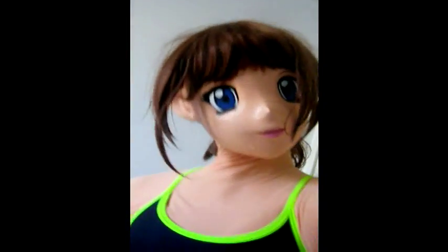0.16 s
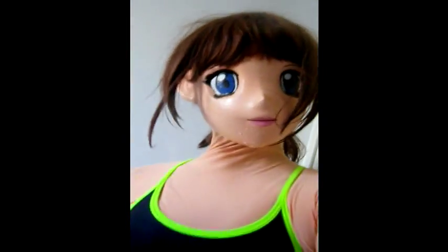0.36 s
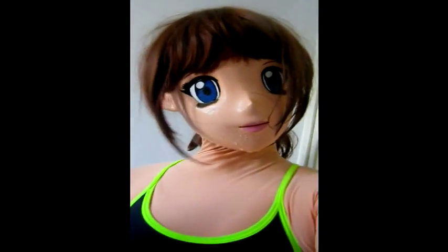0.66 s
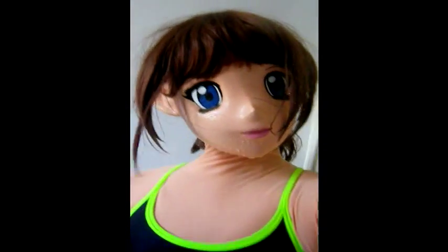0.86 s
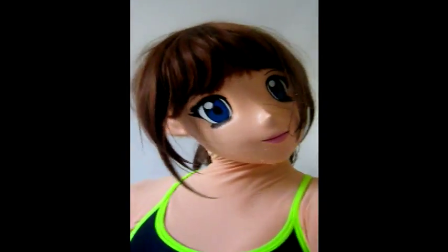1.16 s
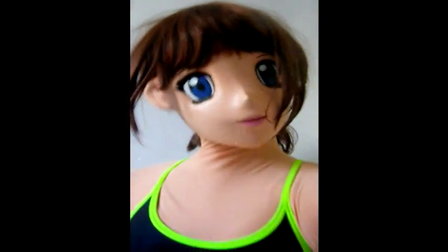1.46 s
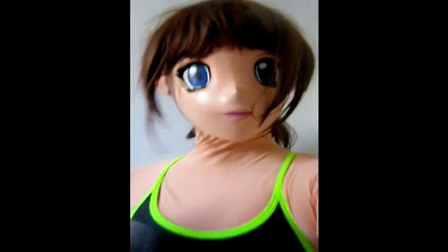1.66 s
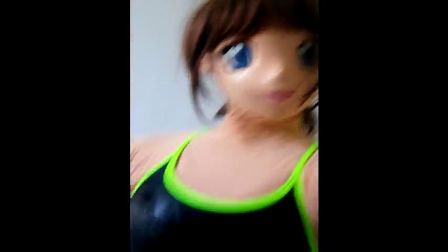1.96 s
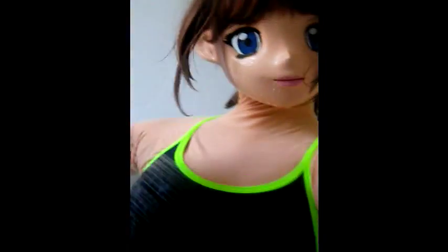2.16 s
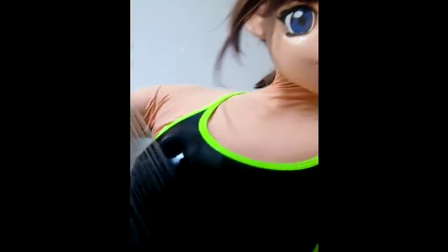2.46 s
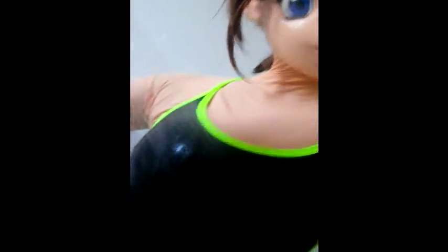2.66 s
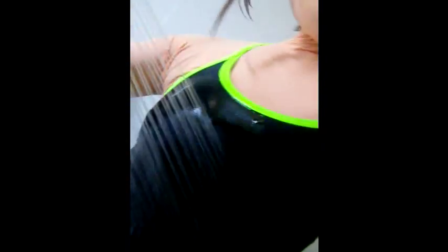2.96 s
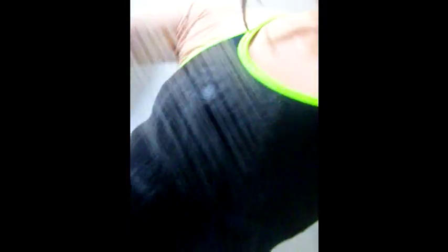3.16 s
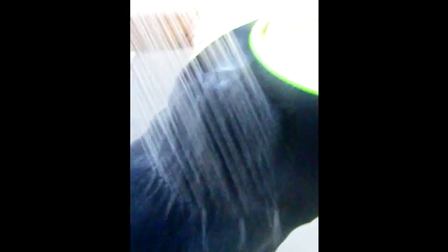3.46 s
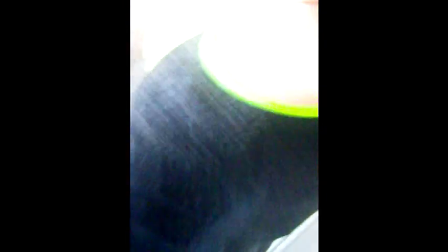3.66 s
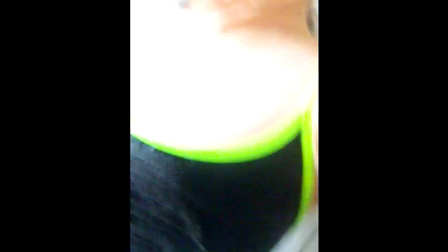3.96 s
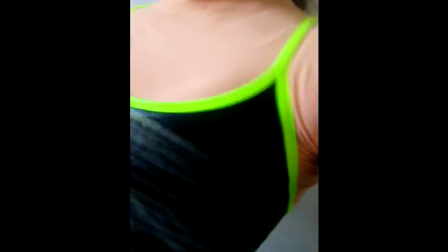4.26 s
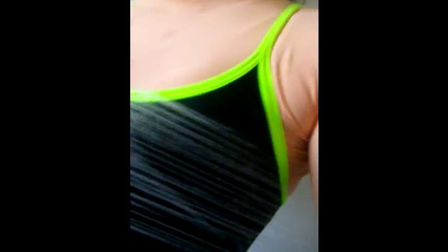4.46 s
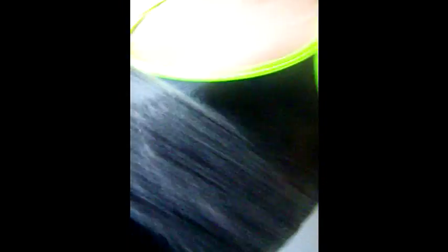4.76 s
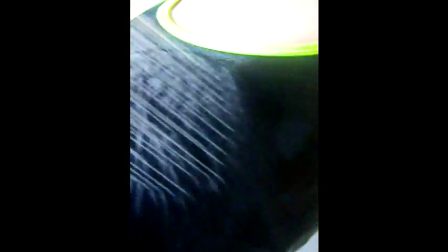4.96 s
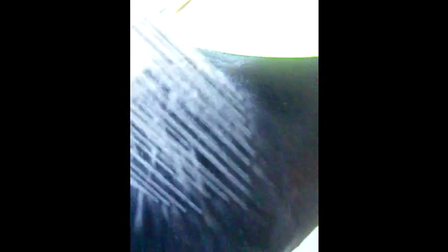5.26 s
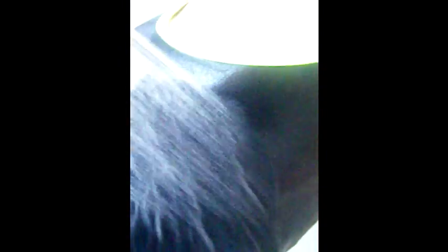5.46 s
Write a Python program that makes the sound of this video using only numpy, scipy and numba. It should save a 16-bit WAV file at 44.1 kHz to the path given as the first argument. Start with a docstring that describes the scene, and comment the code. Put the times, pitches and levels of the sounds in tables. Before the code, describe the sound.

In a small tiled bathroom, water surges up a shower hose with faint gurgles and hiss. A hard crack and airy burst spit from the head, quickly followed by a fizzing second spit. Then fine jets hiss continuously, pattering and splashing on a stretched swimsuit while run-off drums dully on the tub. A close phone microphone gives a bright sound with little bass and short echoes.

```python
"""Water gurgles and hisses up the hose of a hand shower in a small tiled bathroom, then trapped air spits twice.
Fine jets follow, hissing and pattering on a stretched swimsuit close by, while the run-off drums on the tub.
The jets sweep over the body, so the hollow note of the cloth and the splash come and go.
Water is built from noise and random drops, shaped by spectra and moving resonances; air pops ring the casing.
A phone microphone with narrow notches listens."""
import sys
import numpy as np
from scipy import signal
from scipy.fft import rfft, irfft, next_fast_len
from scipy.io import wavfile
from numba import njit

SR = 44100
rng = np.random.default_rng(int(sys.argv[2]) if len(sys.argv) > 2 else 0)


def transcribe(signal):
    """Save signal, clipped to [-1, 1], as a 16-bit WAV file at the path in sys.argv[1]."""
    frames = np.atleast_2d(signal).T
    limited = np.clip(frames, -1, 1)
    pcm = np.round(limited * 32767).astype(np.int16)
    wavfile.write(sys.argv[1], SR, pcm)


N = 247401
T = np.arange(N) / SR   # time of every sample, in seconds

# Tone of fine mist and fizz: pitch_hz, level_db (per Hz, relative)
MIST_TONE = [(7000, -15), (10000, -8), (11500, -7), (13000, -4.5), (14700, -5.5), (15600, -3.5)]
# Flow of the open shower: time_s, jet_hiss_db, mist_db, drumming_db
FLOW_LEVELS = [(0.86, -27, -38, -58), (0.91, -27, -25, -37), (0.99, -30.5, -29.5, -30.5),
               (1.08, -23.5, -24.5, -19.5), (1.14, -25, -19.5, -23), (1.27, -26, -23.5, -23.5),
               (1.4, -23, -21, -25), (1.51, -20.5, -21.5, -21), (1.57, -20.5, -25, -27),
               (1.63, -22, -27, -28.5), (1.8, -16.5, -24, -33), (1.97, -18.5, -32, -34.5),
               (2.24, -17.5, -26, -33.5), (2.5, -18.5, -27, -30.5), (2.97, -17, -26, -37),
               (3.05, -20.5, -27, -34.5), (3.32, -18, -24.5, -35.5), (3.4, -21, -26.5, -33.5),
               (3.78, -17.5, -26, -30), (3.95, -19.5, -30, -35.5), (4.1, -19, -26, -37),
               (4.4, -23.5, -24, -32.5), (4.75, -23.5, -22.5, -27.5), (4.9, -20.5, -22, -28),
               (4.98, -19.5, -25, -34.5), (5.2, -20, -22, -40), (5.61, -21, -24.5, -39)]


def amp(db):
    """Turns a level in dB into a gain."""
    return 10 ** (np.asarray(db) / 20)


def rms_one(x):
    """Scales a sound to an average strength (rms) of 1."""
    return x / np.sqrt(np.mean(x ** 2) + 1e-20)


def in_time(rows):
    """Draws straight lines between table rows; gives each column at every sample."""
    times_s, *columns = np.transpose(rows)
    return [np.interp(T, times_s, column) for column in columns]


def fade(start_s, rise_s):
    """Rises in a straight line from silence to full."""
    return np.clip((T - start_s) / rise_s, 0, 1)


def drift(rate_hz):
    """Slow random wandering of spread 1: noise smoothed twice, made at every 40th sample."""
    keep = np.exp(-80 * np.pi * rate_hz / SR)
    noise = rng.standard_normal(N // 40 + 2002)
    slow = signal.lfilter([1], [1, -2 * keep, keep * keep], noise)[2000:]   # skip the start-up
    return np.interp(np.arange(N) / 40, np.arange(len(slow)), rms_one(slow))


def colour(x, tone):
    """Filters x with a curve of (pitch_hz, level_db) points; rms 1."""
    size = next_fast_len(N)
    pitch_hz, level_db = np.transpose(tone)
    log_hz = np.log(np.maximum(np.arange(size // 2 + 1) * SR / size, 1))
    gain = amp(np.interp(log_hz, np.log(pitch_hz), level_db))
    return rms_one(irfft(rfft(x, size) * gain, size)[:N])


def drops(per_s, spread_db):
    """Random impacts of uneven size, pushing either way; rms 1."""
    sizes = amp(spread_db * np.minimum(rng.exponential(1, N), 5))
    signs = rng.choice([-1, 1], N)
    return rms_one(sizes * signs * (rng.random(N) < per_s / SR))


@njit
def resonate(x, hz, width_hz, sr):
    """A resonance whose centre and width may move; gain 1 on top."""
    y = np.zeros(len(x))
    for i in range(2, len(x)):
        r = np.exp(-np.pi * width_hz[i] / sr)
        push = (1 - r * r) / 2 * (x[i] - x[i - 2])
        y[i] = push + 2 * r * np.cos(2 * np.pi * hz[i] / sr) * y[i - 1] - r * r * y[i - 2]
    return y


def band(x, hz, width_hz):
    """Sends x twice through the same resonance; rms 1."""
    hz, width_hz = hz + 0 * T, width_hz + 0 * T   # one value per sample
    once = resonate(x, hz, width_hz, SR)
    return rms_one(resonate(once, hz, width_hz, SR))


def pipe_rush():
    """Steady rush in the wall pipe: noise wakes the pipe's own resonances."""
    # Pipe resonances: pitch_hz, width_hz, level_db
    pipe_modes = [(118, 14, -69), (165.7, 9.2, -52.5), (195, 6.4, -55), (248, 15, -52.5),
                  (313.3, 36, -54.5), (472.6, 6.7, -48), (551, 29, -50.5), (626, 27, -51)]
    rush = rng.standard_normal(N)
    return sum(amp(db) * band(rush, hz, width_hz) for hz, width_hz, db in pipe_modes)


def filling():
    """Water pushes air up the hose in surges: dull gurgle, sinking hollow note and hiss swell and die away."""
    # Surges of rising water: start_s, gurgle_db, hiss_db, air_column_hz, column_db
    surges = [(0.0, -61, -63, 620, -62), (.07, -56, -59, 620, -62), (.258, -42, -46, 680, -38.5),
              (.425, -50, -40, 1290, -39.5), (.665, -40, -45, 550, -41)]
    # Tone of the gurgle: pitch_hz, level_db (per Hz, relative)
    gurgle_tone = [(60, 1), (120, -7.5), (220, 0.5), (500, 2), (1000, 1), (1400, 2.5), (1800, -7.5),
                   (2800, -18)]
    # Tone of the filling hiss: pitch_hz, level_db (per Hz, relative)
    hiss_tone = [(880, -41), (1500, -5), (2220, -4), (2420, 0), (2780, -6), (4910, -2), (5970, -8),
                 (7120, -5.5), (7930, -6), (8580, -10.5), (15600, -23)]
    rise_s = 0.027
    gurgle_t60_s, hiss_t60_s, column_t60_s = 1, 0.87, 0.76   # time to fall by 60 dB
    sag_hz_per_s, column_width_hz = 1000, 380

    gurgle, hiss = amp(-48), amp(-47)   # idle levels, which the surges add to
    note, column_hz = 0, surges[0][3]
    for start_s, gurgle_db, hiss_db, hz, column_db in surges:
        age, rise = np.maximum(T - start_s, 0), fade(start_s, rise_s)
        gurgle = gurgle + rise * amp(gurgle_db - 60 * age / gurgle_t60_s)
        hiss = hiss + rise * amp(hiss_db - 60 * age / hiss_t60_s)
        # each surge replaces the hollow note of the one before
        note = note * (1 - rise) + rise * amp(column_db - 60 * age / column_t60_s)
        column_hz = np.where(T < start_s, column_hz, np.maximum(hz - sag_hz_per_s * age, 200))

    gurgling = gurgle * amp(0.5 * drift(7.2)) * colour(drops(8000, 2.5), gurgle_tone)
    hollow = note * band(drops(8000, 1.6), column_hz, column_width_hz)
    hissing = hiss * amp(1.3 * drift(12)) * colour(rng.standard_normal(N), hiss_tone)
    return gurgling + hollow + hissing


def spits():
    """Air pockets crack the casing, blow a dying blast with fizz and a breathy whistle, and shake the hose."""
    # Air spitting from the head: start_s, crack_db, blast_db, blast_t60_s, fizz_db, whistle_db, thump_db
    air_spits = [(0.7021, -20, -18, 0.29, -42, -45, -43), (0.704, -4, -17.5, 0.53, -35, -33, -27.5),
                 (0.829, -26, -20.5, 0.47, -19.5, -32, -46), (.834, -21, -37, 0.098, -40, -16, -42)]
    # Tone of the blast: pitch_hz, level_db (per Hz, relative)
    blast_tone = [(300, -36), (600, -11.5), (900, -19), (1800, -12), (2800, -6.5), (3500, -10.5),
                  (5200, -5), (6000, -10), (7200, -1.5), (10500, -16.5), (15000, -19)]
    # Ringing of the head casing: pitch_hz, level_db, t60_s
    casing_modes = [(2990, -0.5, 0.011), (4200, -21, .006), (5000, -15, 0.0089), (9250, -5, 0.0068)]
    whistle_hz, whistle_width_hz = 4760, 1600
    thump_start_hz, thump_end_hz, thump_sink_s = 194, 131, 0.13
    thump_width_hz, thump_t60_s = 63, 0.53

    air = drops(14000, 1.6)
    blast, fizz = colour(air, blast_tone), colour(air, MIST_TONE)
    whistle = band(drops(11000, 2.9), whistle_hz, whistle_width_hz)   # air squeezed through wet nozzles
    # the hose grows heavy as it fills, so its thump sinks
    sinking = np.exp(-np.maximum(T - air_spits[0][0], 0) / thump_sink_s)
    thump_hz = thump_end_hz + (thump_start_hz - thump_end_hz) * sinking
    thump = band(rng.standard_normal(N), thump_hz, thump_width_hz)

    out, clicks = np.zeros(N), np.full(N, 1e-18)
    for start_s, crack_db, blast_db, blast_t60_s, fizz_db, whistle_db, thump_db in air_spits:
        age = np.maximum(T - start_s, 0)
        clicks[round(start_s * SR)] = amp(crack_db)
        breath = amp(blast_db) * blast + amp(fizz_db) * fizz + amp(whistle_db) * whistle
        out += fade(start_s, 0.0012) * amp(-60 * age / blast_t60_s) * breath
        out += fade(start_s, 0.072) * amp(thump_db - 60 * age / thump_t60_s) * thump   # swells late
    for hz, level_db, t60_s in casing_modes:
        r, w = amp(-60 / (t60_s * SR)), 2 * np.pi * hz / SR
        out += amp(level_db) * signal.lfilter([0, np.sin(w)], [1, -2 * r * np.cos(w), r * r], clicks)
    return out


def run_off():
    """Run-off drums on the tub: random drops with a dull tone and two tub resonances."""
    # Tone of the drumming: pitch_hz, level_db (per Hz, relative)
    tub_tone = [(41, -62), (70, -32), (130, -25), (153, -16.5), (238, -7.5), (324, -8), (383, -1.5),
                (631, 1), (694, 1), (1200, -2), (1560, -4.5), (2640, -120)]
    # Tub resonances: pitch_hz, width_hz, level_db (before 18 dB is taken off)
    tub_modes = [(326, 55, -3), (632, 43, 3.5)]
    _, _, drum_db = in_time(FLOW_LEVELS)
    drumming = colour(drops(8000, 2.37), tub_tone)
    ringing = sum(amp(db - 18) * band(drumming, hz, width_hz) for hz, width_hz, db in tub_modes)
    return amp(drum_db + 1.47 * drift(8.1)) * rms_one(drumming + ringing)


def jets():
    """Jets break into droplets in the air, heard as a hiss and a finer mist."""
    # Tone of the jet hiss: pitch_hz, level_db (per Hz, relative)
    jet_tone = [(300, -60), (1000, -10), (3000, -14), (4300, -3.5), (5350, 1), (5750, -7.5), (6900, -0.5),
                (8500, -5), (9600, -12.5), (11000, -25), (14000, -18)]
    hiss_db, mist_db, _ = in_time(FLOW_LEVELS)
    breakup = drops(18000, 2.4)
    hiss = amp(hiss_db + 0.47 * drift(9.5)) * colour(breakup, jet_tone)
    mist = amp(mist_db + 1.0 * drift(7.4)) * colour(breakup, MIST_TONE)
    return hiss + mist


def landing():
    """Jets pass over the suit, sounding air pocket, stretched cloth and patter; splash and ring lie above."""
    # Passes over the suit: start_s, rise_s, length_s, hollow_from_hz, hollow_to_hz,
    # hollow_db (midway), swell_db_per_s, cloth_from_hz, cloth_to_hz, cloth_db, patter_db
    passes = [(0.938, 0.088, 0.65, 950, 990, -33.5, 0.5, 1310, 1430, -47, -25),
              (1.58, 0.069, 0.17, 990, 1040, -40, -20, 1950, 1510, -28, -27),
              (1.856, 0.053, .31, 1240, 1170, -35.5, -5, 1880, 1870, -28.5, -23.5),
              (2.27, .05, .13, 1060, 1130, -28, -30, 1780, 1720, -46, -32),
              (2.424, .05, 0.27, 1070, 1120, -28.5, -2.5, 1660, 1660, -25, -22.5),
              (2.908, 0.057, 0.3, 1070, 1150, -29.5, -48, 1390, 1340, -25, -23.5),
              (3.288, 0.043, .15, 1140, 1090, -24, -30, 1500, 1570, -28.5, -25.5),
              (3.467, .05, 0.24, 1100, 1130, -29, -3, 1480, 1430, -32, -28),
              (3.845, 0.065, 0.19, 1000, 1070, -30.5, -16, 1800, 2000, -49, -32),
              (4.044, 0.083, 0.24, 1140, 1280, -26.5, 6, 2150, 2400, -35, -28.5),
              (4.326, 0.053, 0.22, 1250, 1250, -33, -15, 2520, 2610, -30, -33),
              (4.598, 0.054, .11, 1280, 1350, -32, 5, 2540, 2460, -42, -27.5),
              (4.732, 0.064, 0.21, 1430, 1314, -24, -31, 2450, 2470, -41, -27),
              (5.034, 0.04, 0.13, 1160, 1220, -35, -10, 2420, 2430, -33, -36),
              (5.212, 0.04, .5, 1160, 1150, -30, -7, 2440, 2530, -30, -30.5)]
    # Drops bursting on the suit: time_s, splash_hz (centre), splash_db
    splashes = [(.95, 3200, -29), (1.1, 3160, -22), (1.23, 3100, -28), (1.48, 3400, -22), (1.7, 3100, -22),
                (1.82, 3300, -51), (1.93, 3150, -20.5), (2.1, 3000, -32), (2.2, 3600, -47),
                (2.41, 3680, -29), (2.47, 3000, -27), (3.2, 3350, -27.5), (3.65, 3600, -22.5),
                (4.05, 3850, -23), (4.2, 3800, -21.5), (4.49, 3000, -20.5), (4.6, 3190, -29),
                (4.78, 3400, -40), (4.83, 3470, -20.5), (4.92, 3400, -18), (5.02, 3150, -21.5),
                (5.61, 3320, -24)]
    # A bright ring in the splash, when the head comes close: top_s, pitch_hz, level_db, half_length_s
    glints = [(3.32, 3600, -32, .05), (4.2, 4180, -27.5, 0.073), (4.357, 3700, -25, 0.054),
              (4.92, 3720, -26, .11), (5.253, 3520, -28.5, 0.16), (5.585, 3700, -21, 0.058)]
    fall_s = 0.11
    pocket_width_hz, cloth_width_hz, patter_width_hz = 196, 260, 1640
    splash_width_hz, glint_width_hz = 3650, 410

    hollow, cloth, patter = 0, 0, amp(-42)   # stray drops patter between passes
    path = []   # time, hollow pitch and cloth pitch at both ends of each pass
    for (start_s, rise_s, length_s, hollow_from_hz, hollow_to_hz, hollow_db, swell,
         cloth_from_hz, cloth_to_hz, cloth_db, patter_db) in passes:
        end_s = start_s + length_s
        on = fade(start_s, rise_s) * (1 - fade(end_s, fall_s))
        from_middle_s = np.clip(T - start_s - length_s / 2, -1, 1)
        hollow = hollow + on * amp(hollow_db + swell * from_middle_s)
        cloth = cloth + on * amp(cloth_db)
        patter = patter + on * amp(patter_db)
        path += [(start_s, hollow_from_hz, cloth_from_hz), (end_s, hollow_to_hz, cloth_to_hz)]
    hollow_hz, cloth_hz = in_time(path)
    patter_hz = 1603 * (cloth_hz / 1700) ** 0.38   # follows part of the cloth note's change
    splash_hz, splash_db = in_time(splashes)
    glint = sum(amp(db) * np.exp(-((T - top_s) / half_s) ** 2) for top_s, _, db, half_s in glints)
    glint_hz, = in_time([row[:2] for row in glints])

    layers = [(hollow, hollow_hz, pocket_width_hz), (cloth, cloth_hz, cloth_width_hz),
              (patter, patter_hz, patter_width_hz), (amp(splash_db), splash_hz, splash_width_hz),
              (glint, glint_hz, glint_width_hz)]
    return sum(gain * amp(1.04 * drift(18)) * band(drops(9000, 2.0), hz, width_hz)
               for gain, hz, width_hz in layers)


def spray():
    """The open shower: pipe, run-off and jets, then the landing; an unsteady flow shakes them all."""
    flowing = fade(0.7, 0.072) * (jets() + run_off() + pipe_rush())
    return amp(0.077 * drift(1.8)) * (flowing + fade(0.86, 0.21) * landing())


def bathroom(x):
    """Tiles throw sound back: six repeating echoes, weaker and duller on every round."""
    t60_s, wall_cut_hz = 0.35, 5600
    out, dull = np.zeros(N), np.exp(-2 * np.pi * wall_cut_hz / SR)
    lags = (rng.uniform(.012, .035, size=6) * SR).astype(int)   # delays in samples
    for k, lag in enumerate(lags):
        loop, gain, state = x.copy(), amp(-60 * lag / SR / t60_s), [0.]
        for i in range(lag, N, lag):   # one delay length at a time
            back, state = signal.lfilter([gain * (1 - dull)], [1, -dull], loop[i - lag:i], zi=state)
            loop[i:i + lag] += back[:N - i]
        out += (loop - x) * (-1) ** k   # echoes only, every other one turned over
    return out


def scene():
    """All water sounds, direct and off the tiles."""
    water = filling() + spits() + spray()
    return (water + amp(-17) * bathroom(water))[None]


def record(dry):
    """The microphone cuts bass, adds a rumble, rounds peaks, has three narrow notches and a steep top."""
    # Notches: pitch_hz, width_hz
    notches = [(7860, 750), (9000, 29), (10000, 130)]
    bass_cut_hz, quiet_rumble_db, top_cut_hz = 180, -82.5, 15680
    peak = 1.2   # peaks round off toward this height
    x = signal.sosfilt(signal.butter(2, bass_cut_hz, "high", fs=SR, output="sos"), dry)
    rumble = rms_one(signal.lfilter([1], [1, -.985], rng.standard_normal(N)))
    # the stream stirs the air at the port, most at first
    stirring = (9.0 + 8.1 * np.exp(-np.maximum(T - .7, 0) / 0.58)) * fade(.7, .02)
    x = x + amp(quiet_rumble_db) * rumble * (1 + stirring)
    x = peak * np.tanh(x / peak)
    for hz, width_hz in notches:
        x = signal.lfilter(*signal.iirnotch(hz, hz / width_hz, SR), x)
    return signal.sosfilt(signal.ellip(13, .5, 80, top_cut_hz, fs=SR, output="sos"), x)


dry = scene()
out = record(dry)
transcribe(out)
```